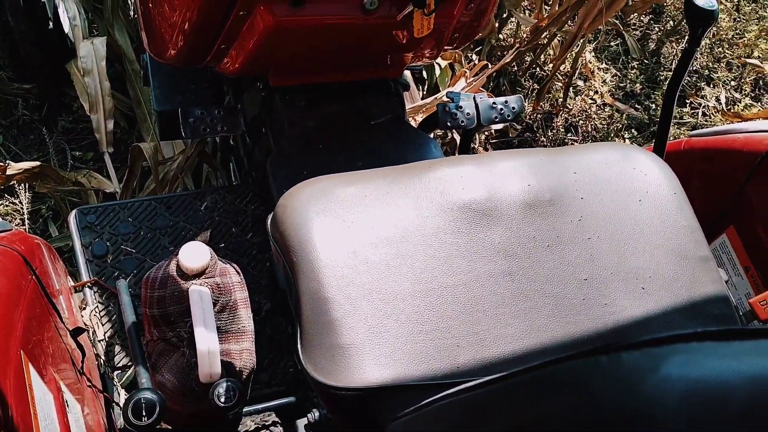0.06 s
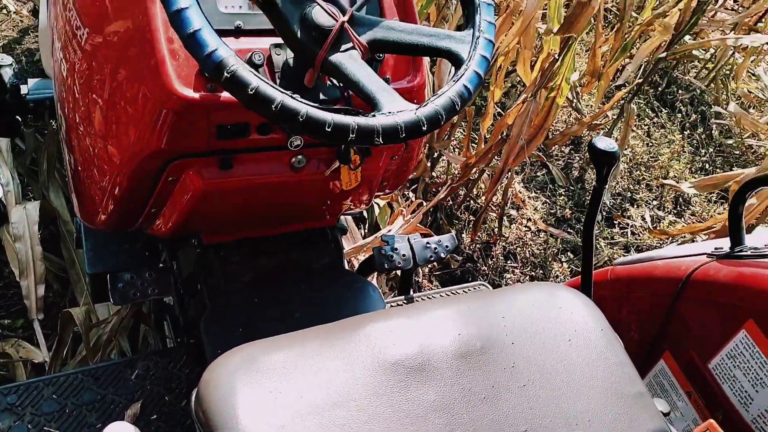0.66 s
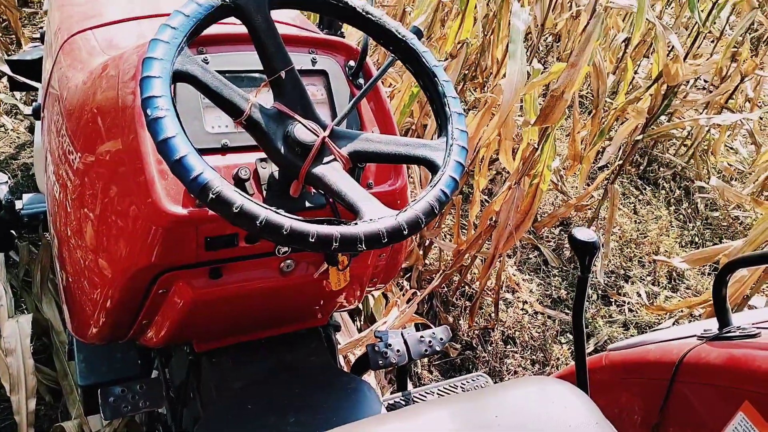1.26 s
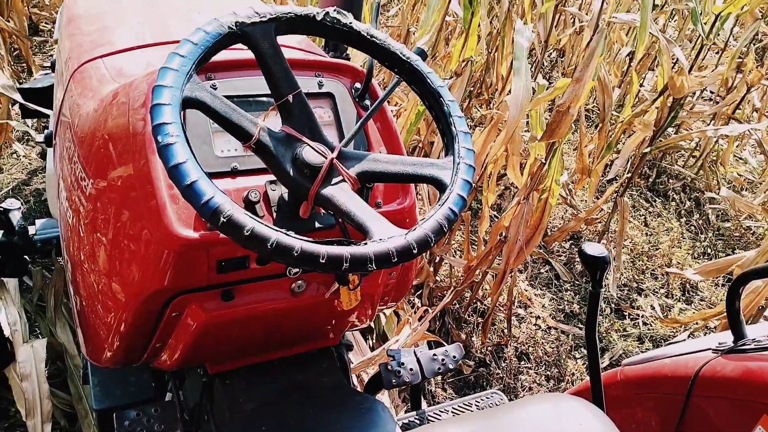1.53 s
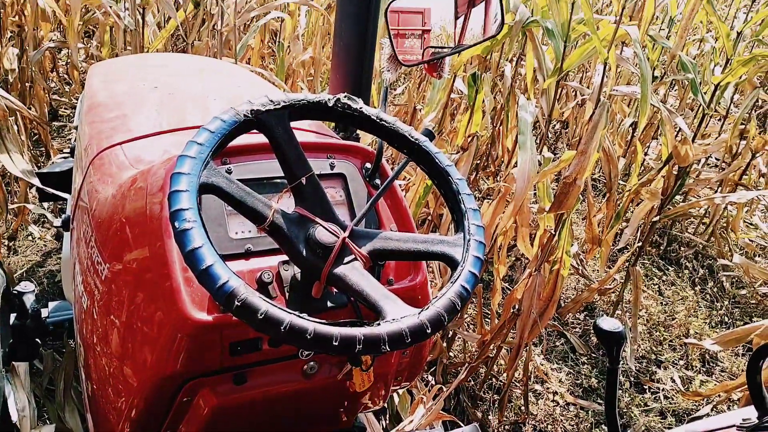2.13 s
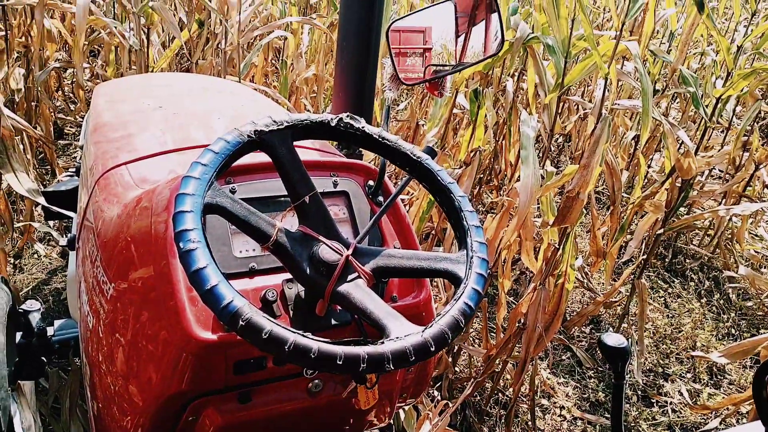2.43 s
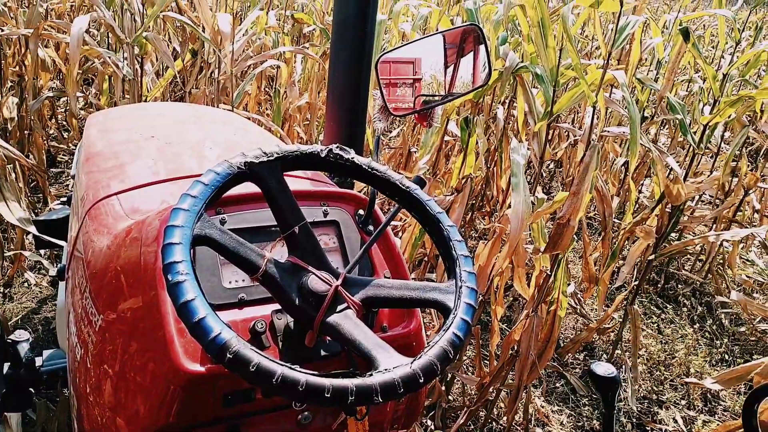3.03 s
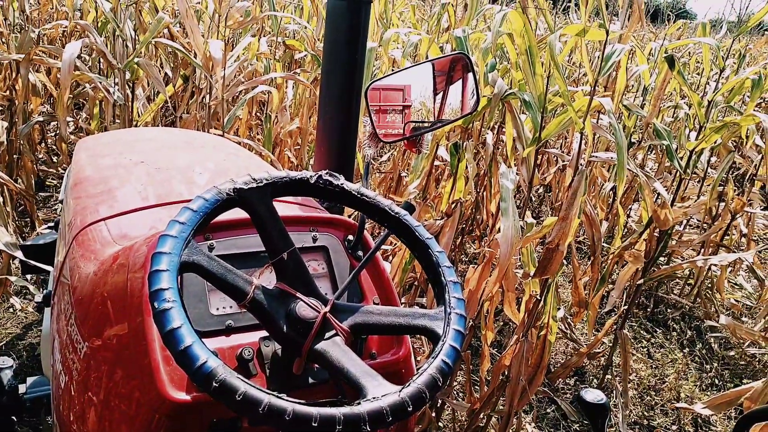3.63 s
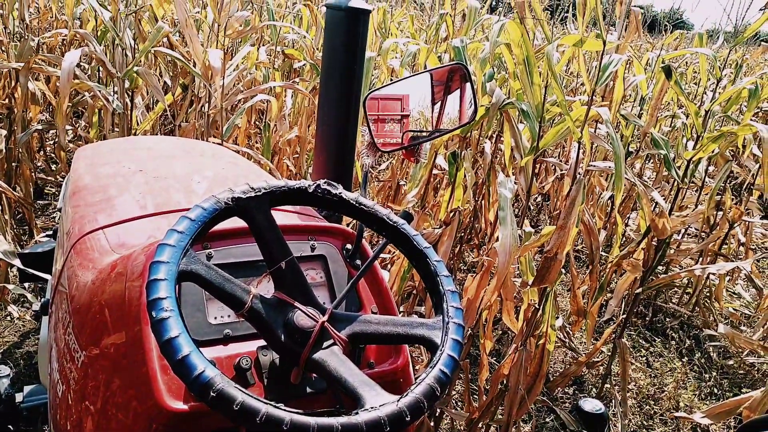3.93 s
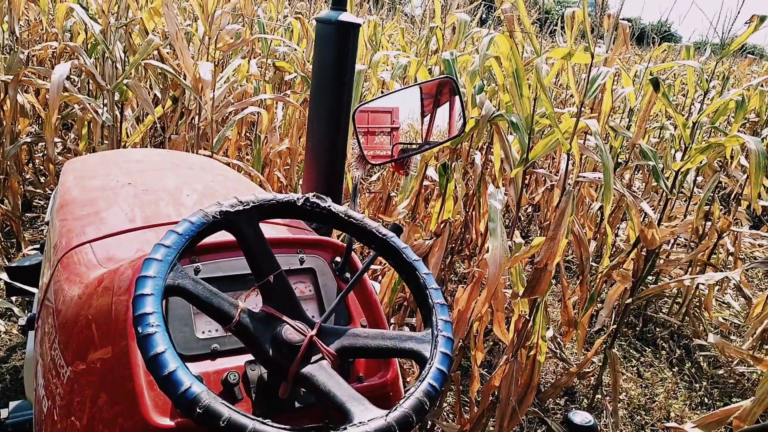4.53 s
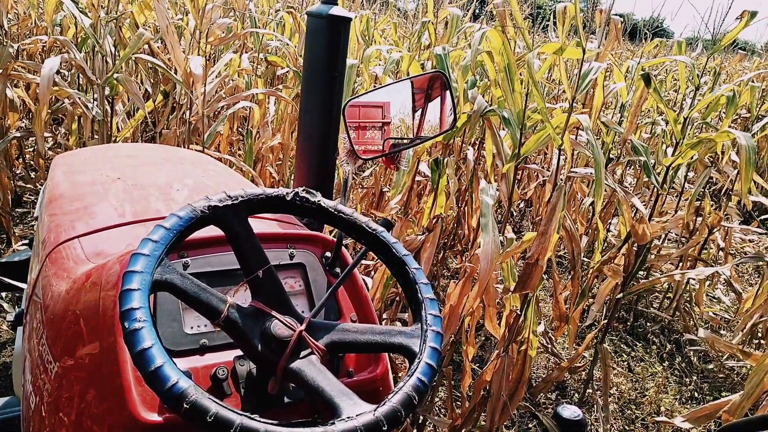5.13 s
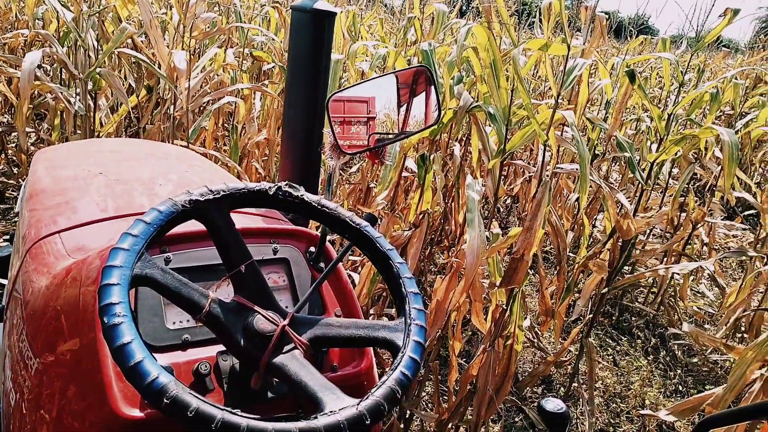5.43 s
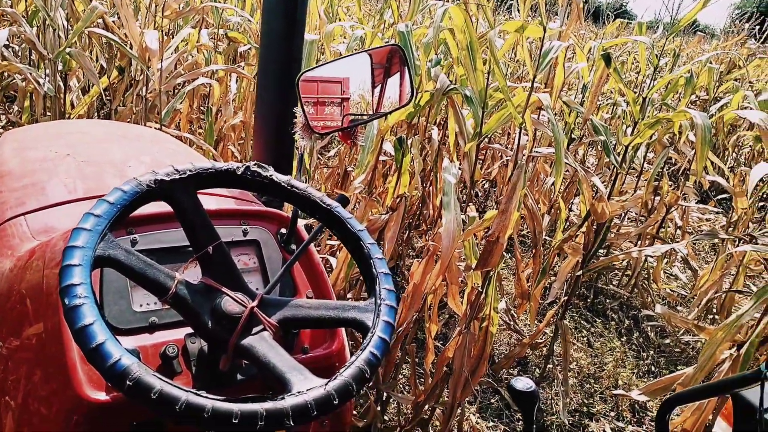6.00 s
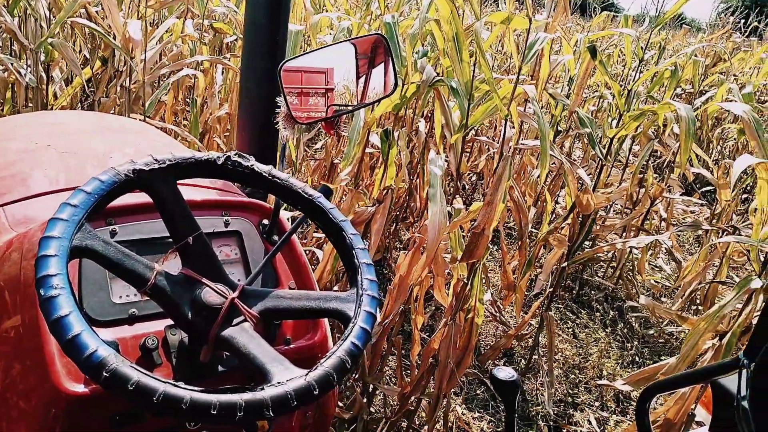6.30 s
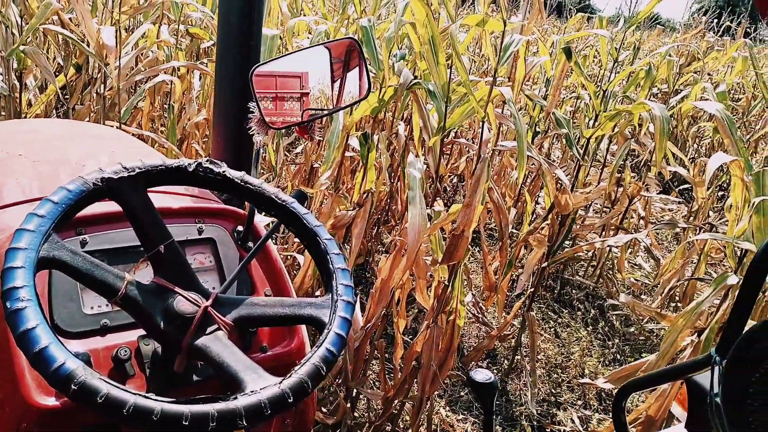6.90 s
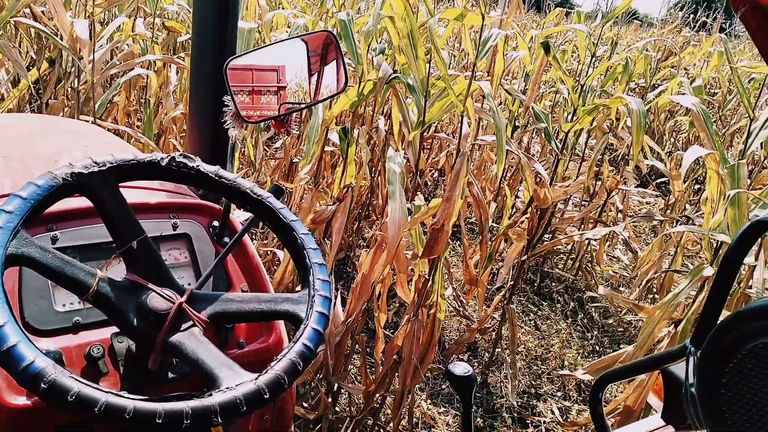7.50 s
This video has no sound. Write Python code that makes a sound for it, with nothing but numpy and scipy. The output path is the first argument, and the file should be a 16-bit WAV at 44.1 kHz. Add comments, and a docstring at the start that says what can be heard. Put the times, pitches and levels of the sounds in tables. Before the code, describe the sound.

Gusts move through dry corn close by, making a crisp, papery rustle full of tiny crackles, with a few sharp stalk snaps and soft, dull bumps. The rustling is strongest in the first half, then drops to scattered light brushes and flicks, with one small hollow tap shortly before the end. Behind it lie the even hush of the open field and the faint low hum of a far engine.

```python
"""At the edge of a corn field, dry leaves rustle close by in uneven swells of wind.
Each swell is a mass of tiny scrapes and crackles of leaf on leaf; single leaves flick, brush past and
bump softly, and brittle stalks snap. Near the end something hollow is tapped once.
An engine idles far off under the hush of the field. Each microphone port colours the treble its own way.
"""
import sys
import numpy as np
from scipy import signal
from scipy.fft import rfft, irfft, next_fast_len
from scipy.io import wavfile
from scipy.ndimage import uniform_filter1d, map_coordinates

SR = 44100
rng = np.random.default_rng(int(sys.argv[2]) if len(sys.argv) > 2 else 0)


def generate_wav(signal):
    """Clip the signal to [-1, 1] and save it as 16-bit WAV at the path in sys.argv[1]."""
    frames = np.transpose(np.atleast_2d(signal))
    scaled = np.clip(frames, -1, 1) * 32767
    pcm = np.round(scaled).astype(np.int16)
    wavfile.write(sys.argv[1], SR, pcm)


N = 341775
FFT_SIZE = next_fast_len(N + 8192)
BIN_HZ = np.fft.rfftfreq(FFT_SIZE, 1 / SR)
TIME = np.arange(N) / SR


def amp(db):
    """Decibels to gain."""
    return 10 ** (np.asarray(db) / 20)


def unit(x):
    """Scale to rms 1."""
    return x / np.sqrt(np.mean(x ** 2) + 1e-20)


def over_frequency(points):
    """Join (Hz, value) points on a log axis, one value per bin."""
    hz, values = np.transpose(points)
    return np.interp(np.log(BIN_HZ + 1), np.log(hz + 1), values)


def over_time(points):
    """Join (seconds, value) points, one value per sample."""
    return np.interp(TIME, *np.transpose(points))


def wobble(rate):
    """A smooth random curve, rate knots a second."""
    return map_coordinates(rng.standard_normal(int(N * rate / SR) + 4), [TIME * rate])


def stereo(pair, spectrum):
    """Colour two unrelated signals and blend them into a sound of rms 1 that comes from the right."""
    # Each row: frequency in Hz, likeness of left and right from 0 to 1.
    likeness = [(80, 0.88), (250, 0.66), (560, 0.51), (1000, 0.82), (1380, 0.58), (2500, 0.33), (3300, 0.4),
                (4500, 0.084), (6000, 0.024), (14000, 0.034)]
    # Each row: frequency in Hz, lag of the left port in ms.
    left_lag = [(200, 0.13), (800, 0.25), (1400, 0.35), (3000, 0.48), (5000, 0.493)]
    coloured = rfft(pair, FFT_SIZE) * amp(over_frequency(spectrum))
    spread = np.arccos(np.clip(over_frequency(likeness), 0, 1)) / 2
    mid, side = coloured[0] * np.cos(spread), coloured[1] * np.sin(spread)
    delay = np.exp(-2j * np.pi * BIN_HZ * over_frequency(left_lag) / 1000)
    return unit(irfft([(mid + side) * delay, mid - side], FFT_SIZE)[:, :N])


def stroke(peak_s, rise, t60):
    """Envelope of a sliding contact: it swells to its peak, holds a moment and falls ever faster."""
    first, last = max(round((peak_s - .1) * SR), 0), min(round((peak_s + .3) * SR), N)
    t = TIME[first:last] - peak_s
    attack = np.exp(-.5 * (t / rise) ** 2)
    decay = np.exp(-np.log(1000) * np.abs(t / t60) ** 1.56)
    envelope = np.zeros(N)
    envelope[first:last] = np.where(t < 0, attack, decay)
    return envelope


def burst(peak_s, db, rise, t60, hz, width):
    """A short push of noise through one broad resonance, from hz / width to hz * width."""
    band = signal.butter(2, [hz / width, min(hz * width, .45 * SR)], "bandpass", fs=SR, output="sos")
    noise = unit(signal.sosfilt(band, rng.standard_normal(N)))
    return amp(db) * stroke(peak_s, rise, t60) * noise


def friction(slips_per_s, grain_share, patchy_db):
    """Leaf on leaf: tiny slips of uneven size over a smooth hiss; the colour shifts as contacts change."""
    slips = (rng.random(N) < slips_per_s / SR) * rng.standard_normal((2, N))
    hiss = rng.standard_normal((2, N))
    rub = np.sqrt(grain_share) * unit(slips) + np.sqrt(1 - grain_share) * hiss
    spectra = signal.stft(rub, nperseg=1024)[2]

    def patches(bins):
        """Resonances of one width that come and go."""
        ridges = uniform_filter1d(rng.standard_normal(spectra.shape[1:]), bins, axis=0)
        return unit(uniform_filter1d(ridges, size=5, axis=1))

    gain_db = patchy_db * unit(patches(bins=4) + 0.38 * patches(bins=24))
    return signal.istft(spectra * amp(gain_db), nperseg=1024)[1][:, :N]


def catches(typical_per_s, life_s, depth_db):
    """Leaves catch and let go at an uneven pace: the level jumps and sinks back."""
    count = np.cumsum(typical_per_s * amp(5 * wobble(40)) / SR)
    kicks = np.diff(np.floor(count), prepend=0) * rng.uniform(0.1, 1, N)
    surge = signal.lfilter([1], [1, -np.exp(-1 / (life_s * SR))], kicks)
    return unit(amp(depth_db * unit(surge - surge.mean())))


def contact_power(db, body_db, fizz_db):
    """Power of one leaf contact in three registers: scrape, body and fizz."""
    return amp([[db], [db + body_db], [db + fizz_db]]) ** 2


def leaves():
    """Wind, sweeping blades and single flicks drive the same friction through three leaf registers."""
    # Dry scrape, papery body and high fizz. Each row: frequency in Hz, spectral level in dB.
    registers = [(300, -54), (900, -19.5), (1400, -8.5), (1850, 1.5), (2100, 0.5), (2600, 2.5), (3100, 1.5),
                 (3650, 1), (4300, 0.5), (6800, 1), (8500, -8.5), (14000, -57)], [(50, -10), (120, -2.5), (165, -8), (220, 1), (300, -2), (385, 2.5),
                                 (480, -2.5), (560, 3), (680, -1.5), (880, 2.5), (1100, 0.5), (1500, -0.5),
                                 (4000, -39)], [(3000, -44), (6500, -7.5), (8300, 2), (14000, -3.5)]
    # Wind in the near leaves. Each row: time in seconds, strength in dB.
    wind = [(0, -30.5), (.2, -32), (.42, -38), (.68, -35), (.82, -43.5), (1.08, -32), (1.6, -39.5),
            (2.0, -43), (2.2, -41), (2.42, -29), (3.35, -30.5), (4.15, -37.5), (4.47, -46), (4.9, -45),
            (5.14, -54), (5.52, -44.5), (6.1, -50), (6.6, -44.5), (6.95, -50.5), (7.22, -46), (7.75, -51)]
    # Blades brush along their neighbours, swelling evenly up and down. Each row: peak time in seconds,
    # scrape level in dB, half length in seconds, body and fizz in dB against the scrape.
    sweeps = [(0.515, -30.5, 0.059, -11, 0.5), (0.625, -31, 0.026, -15, -1),
              (0.902, -28, 0.025, -15.5, 1.5), (1.14, -31.5, 0.067, -18, 0.5),
              (1.739, -34.5, 0.046, -14.5, 2), (2.28, -35, 0.051, -23, 3.5), (2.358, -26.5, 0.016, -7, 3),
              (2.465, -32.5, .025, -7, 11), (2.662, -26.5, 0.046, -10, 4), (2.857, -28, 0.035, -11, 1),
              (3.08, -28, 0.02, -27, 0), (3.158, -33, 0.039, -8, 3), (3.776, -30.5, 0.025, -10.5, -0.5),
              (3.848, -34, 0.015, -7, 11), (4.027, -25, 0.013, -11, 4), (4.144, -42, 0.017, -16, 13.5),
              (5.452, -41, 0.059, -14, -5), (5.812, -43.5, 0.079, -11, -2), (6.094, -46.5, 0.028, -11, 0),
              (6.45, -36, 0.057, -11, 2), (6.648, -53, 0.024, -2, 10), (7.193, -46, .025, -8, 2),
              (7.318, -40, 0.019, -11.5, 3), (7.65, -43.5, .034, -11, 0)]
    # Single leaves flick. Each row: peak time in seconds, scrape level in dB,
    # seconds to fall 60 dB, body and fizz in dB against the scrape.
    flicks = [(.094, -25, 0.065, -33, 1.5), (.302, -29, 0.083, -4.5, -15), (.539, -27, 0.04, -24, -1),
              (.611, -30.5, 0.045, -5, 1), (.993, -33.5, 0.052, -23.5, 3), (1.297, -27, 0.14, -14, -2.5),
              (1.39, -29.5, 0.057, -21, -10), (1.817, -34, 0.14, -19, -2), (2.016, -31.5, 0.09, -15, -4),
              (2.09, -35, 0.27, -22, -4), (2.596, -25.5, .03, -27, 3), (2.612, -22.5, 0.098, -11.5, -2),
              (2.945, -26.5, 0.28, -13.5, 4.5), (3.616, -29.5, 0.17, -11.5, 6),
              (4.045, -20, 0.097, -14.5, 1), (4.277, -37.5, 0.05, -26, 8), (4.34, -40, 0.058, -20, 4.5),
              (4.543, -42, 0.1, -18, -2), (4.688, -37.5, .055, -11, 2), (4.777, -34, 0.082, -25, 4),
              (5.305, -40.5, 0.088, -20, -7), (5.406, -38, 0.089, -23, -2), (5.842, -40.5, .054, -16, 0),
              (6.202, -45.5, 0.14, -9, 3), (7.494, -44, 0.082, -16, -1), (7.664, -41.5, 0.18, -5.5, -2)]
    # Where the near leaves are. Each row: time in seconds, lean to the left in dB.
    pan = [(0, -2.5), (1.3, -.2), (2.7, -1.1), (3.8, 0.3), (4.05, 1.3), (5.3, 0.4), (7.75, -0.3)]
    rub = friction(slips_per_s=2500, grain_share=0.26, patchy_db=2.5)
    flutter = catches(typical_per_s=48, life_s=0.02, depth_db=1.22)
    wind_db, stiff_breeze_db = over_time(wind), -30
    gust_db = wind_db - stiff_breeze_db
    # Stronger wind is brighter: the fizz grows faster than the body.
    wind_body_db = stiff_breeze_db - 12.5 + 0.81 * gust_db
    wind_fizz_db = stiff_breeze_db + 1.9 + 1.097 * gust_db
    power = amp([wind_db, wind_body_db, wind_fizz_db]) ** 2
    for peak_s, db, half_s, body_db, fizz_db in sweeps:
        swell = np.exp(-np.minimum(((TIME - peak_s) / half_s) ** 2, 50))
        power += contact_power(db, body_db, fizz_db) * swell
    power *= flutter ** 2
    for peak_s, db, t60, body_db, fizz_db in flicks:
        power += contact_power(db, body_db, fizz_db) * stroke(peak_s, rise=0.004, t60=t60) ** 2
    rustle = sum(gain * stereo(rub, register) for gain, register in zip(np.sqrt(power), registers))
    pan_db = over_time(pan)
    return rustle * amp([pan_db / 2, -pan_db / 2])


def engine():
    """A far engine idles: only its firing rate, the octave and a gently swelling rumble carry."""
    # The hum of the idle. Each row: pitch in Hz, level in dB.
    idle_tones = [(43.05, -53.5), (86.1, -51.5)]
    # The low rumble. Each row: frequency in Hz, spectral level in dB.
    rumble_colour = [(15, -20), (30, -20), (40, -6), (52, -4.5), (62, -6.5), (75, 1.5), (88, -9.5),
                     (105, -16), (135, -23), (250, -50), (800, -76)]
    drifting_time = TIME + 0.00023 * wobble(0.75)
    hum = np.zeros(N)
    for hz, db in idle_tones:
        gain = np.sqrt(2) * amp(db + 0.59 * wobble(3.7))
        hum += gain * np.sin(2 * np.pi * (hz * drifting_time + rng.random()))
    swell_db = 1.6 * wobble(8)
    rumble = amp(-49.5 + swell_db) * stereo(rng.standard_normal((2, N)), rumble_colour)
    return (hum + rumble) * amp([[.4], [-.4]])  # a touch louder on the left


def field():
    """The distant crop blurs into an even hush."""
    # Each row: frequency in Hz, spectral level in dB.
    hush_colour = [(60, -23), (170, 2), (400, 3), (900, -14), (1400, 3), (2400, -3), (7000, -0.5),
                   (14000, -2)]
    return amp(-56.5) * stereo(rng.standard_normal((2, N)), hush_colour)


def snaps():
    """Brittle fibres in stalks and blades break with almost no rise; each port hears its own crackle."""
    # Each row: peak time in seconds, level in dB, seconds to fall 60 dB, pitch in Hz.
    breaks = [(.298, -25, 0.086, 2200), (.541, -37, .025, 3200), (1.381, -21, 0.0092, 3000),
              (2.592, -18, 0.014, 5000), (2.841, -22, .03, 2400), (2.946, -27, .033, 3000),
              (3.139, -28, .025, 3200), (4.042, -17, .005, 3200), (4.687, -31, .008, 3500),
              (5.407, -38, .025, 2200), (6.06, -39.5, .034, 1410), (7.665, -33, 0.026, 2390)]
    crackle = np.zeros((2, N))
    for port in crackle:
        for peak_s, db, t60, hz in breaks:
            port += burst(peak_s, db, rise=.0003, t60=t60, hz=hz, width=1.9)
    return crackle


def bumps():
    """Heavier leaves bump in dull, short pushes, alike at both ports."""
    # Each row: peak time in seconds, level in dB, rise in seconds, pitch in Hz.
    pushes = [(.301, -38, 0.0031, 261), (.5, -46, 0.026, 136), (1.573, -54, 0.0044, 594),
              (3.135, -35.5, 0.0079, 230), (3.258, -43.5, .007, 450), (3.785, -32.5, 0.0091, 220)]
    return sum(burst(peak_s, db, rise, t60=0.063, hz=hz, width=1.35) for peak_s, db, rise, hz in pushes)


def knock(start_s):
    """Something hollow is tapped once and rings briefly."""
    # Each row: pitch in Hz, relative level in dB, seconds to fall 60 dB.
    hollow_modes = [(395, 2.5, 0.043), (310, -10, 0.069), (910, -14, 0.087)]
    t = np.maximum(TIME - start_s, 0)
    ring = sum(amp(db - 60 * t / t60) * np.sin(2 * np.pi * hz * t) for hz, db, t60 in hollow_modes)
    attack = 1 - np.exp(-t / .003)
    return amp(-33) * ring * attack


def scene():
    """Near leaves and one knock over the far engine and the field."""
    return leaves() + snaps() + bumps() + knock(start_s=7.214) + engine() + field()


def record(dry):
    """Each microphone port has its own notch in the treble; nothing passes above the band limit."""
    # The colour of each port. Each row: frequency in Hz, gain in dB.
    left_port = [(300, -2.5), (900, 1.5), (1900, 1), (3800, 0.5), (5000, -6.5), (6400, -14), (7150, -24),
                 (7900, -12), (9000, -5), (10800, -4), (12000, -8), (14200, -9.5)]
    right_port = [(300, -2.5), (900, 0.5), (2100, -3.5), (4200, -3), (6300, -4.5), (7000, -6.5),
                  (7700, -14), (8200, -36), (8900, -19), (9700, -16.5), (10800, -16), (12800, -5.5),
                  (14200, -13.5)]
    band_limit_hz = 14400
    response = amp([over_frequency(left_port), over_frequency(right_port)]) * (BIN_HZ < band_limit_hz)
    return irfft(rfft(dry, FFT_SIZE) * response, FFT_SIZE)[:, :N]


dry = scene()
out = record(dry)
generate_wav(out)
```